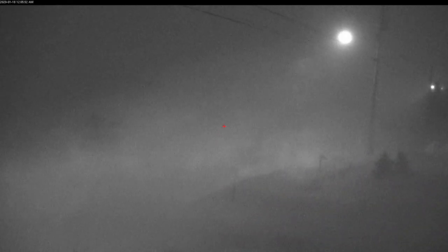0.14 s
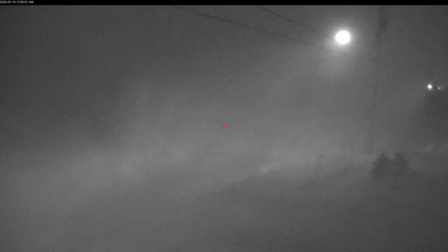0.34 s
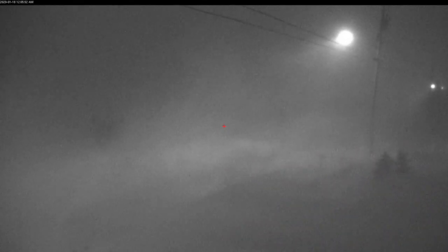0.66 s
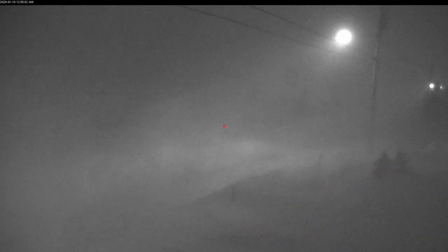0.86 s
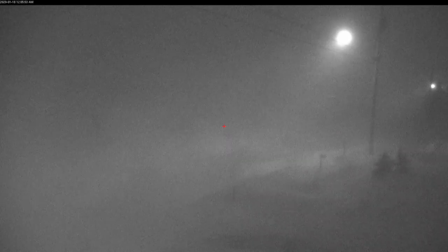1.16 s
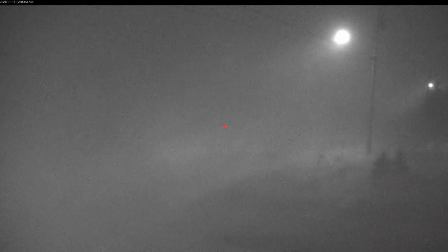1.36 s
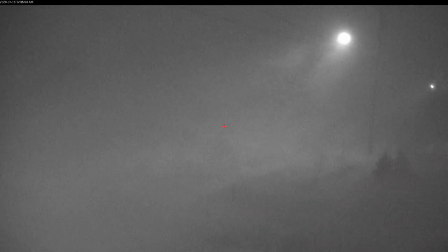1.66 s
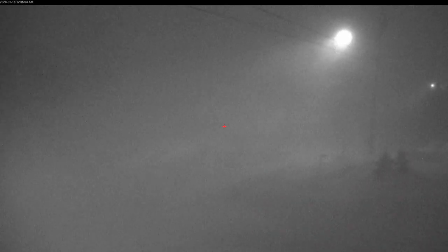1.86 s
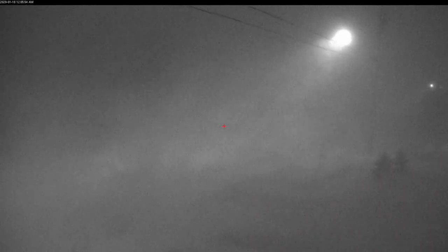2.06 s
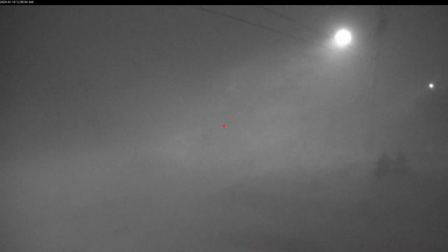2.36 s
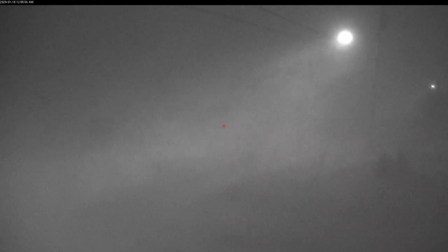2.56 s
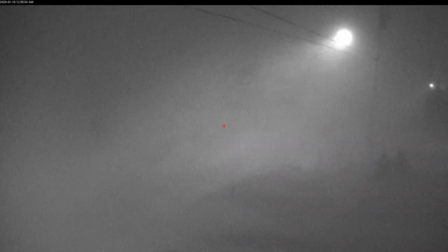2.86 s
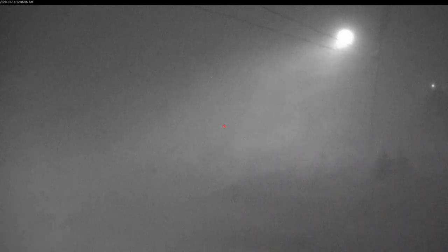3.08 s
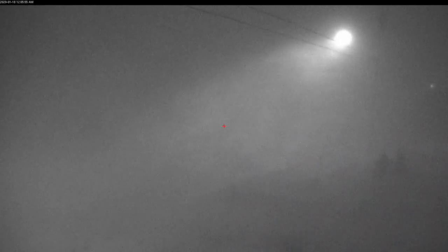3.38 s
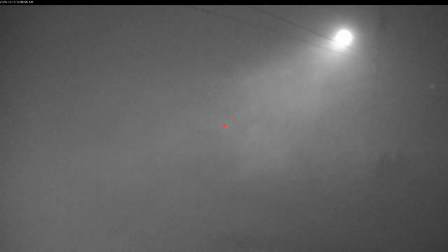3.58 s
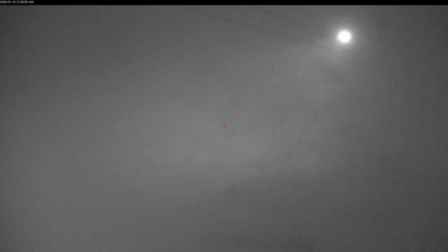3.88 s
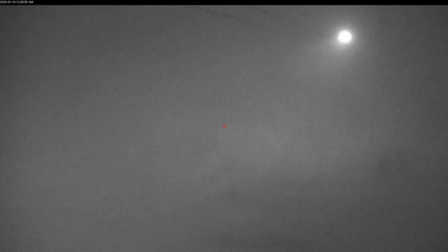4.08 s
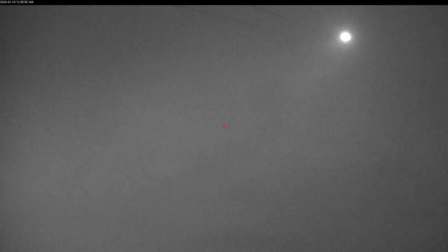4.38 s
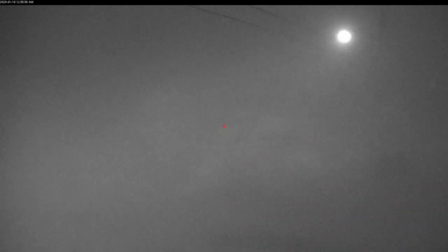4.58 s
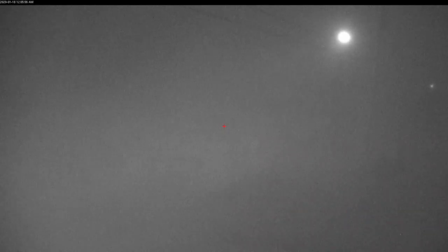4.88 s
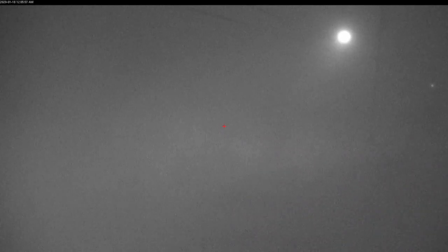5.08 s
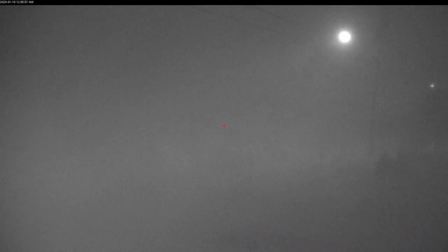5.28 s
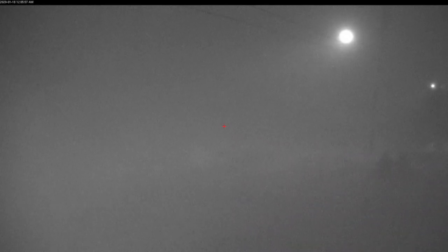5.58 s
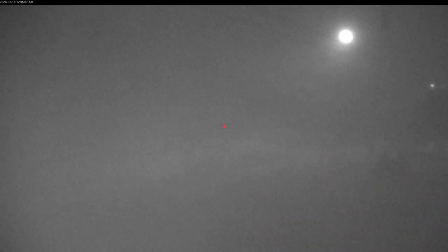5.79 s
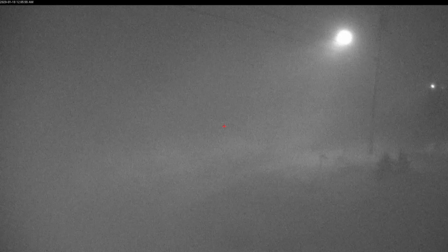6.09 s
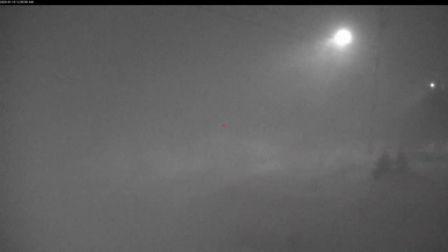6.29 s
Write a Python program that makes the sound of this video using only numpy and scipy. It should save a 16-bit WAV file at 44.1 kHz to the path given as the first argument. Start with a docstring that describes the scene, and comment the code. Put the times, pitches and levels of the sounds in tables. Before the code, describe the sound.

Storm wind buffets the microphone of an outdoor camera for about six and a half seconds: a deep, fluttering rumble with a hollow, drumming roar from the housing. The first second is lighter, with brief lulls. A gust hits at about 1.1 seconds with low thumps, eases, and further gusts follow between 2 and 3 seconds. A strong surge arrives around 4 seconds, dips briefly near 4.4, and then the wind stays heavy, peaking near 5, 5.9 and 6.2 seconds. The mount thumps deeply several times from 4.5 to 6 seconds. Short, dull knocks jolt the housing, most clearly near 2.3 and 4 seconds. Much quieter than the wind, blown snow hisses in flurries and thickens toward the end, while single ice pellets tick irregularly on the shell throughout. Everything sounds very close and in mono.

```python
"""Night blizzard on a security camera

Wind blows against an outdoor camera with one microphone. Eddies buffet the port and thump the mount;
gusts roar in the hollow housing and now and then knock it. Blown snow hisses on the shell, and
single ice pellets tick against it. The resonances of the housing colour both wind and snow."""
import sys
import numpy as np
from scipy import signal
from scipy.fft import rfft, irfft
from scipy.io import wavfile
from scipy.ndimage import uniform_filter1d

SR = 44100
rng = np.random.default_rng(int(sys.argv[2]) if len(sys.argv) > 2 else 0)


def wav_record(signal):
    """Record a signal, one row per channel, as 16-bit PCM in the file named by sys.argv[1]."""
    frames = np.transpose(np.atleast_2d(signal))
    bounded = np.clip(frames, -1, 1)
    # unit amplitude maps onto the largest positive 16-bit level
    quanta = np.round(bounded * 32767).astype(np.int16)
    wavfile.write(sys.argv[1], SR, quanta)


N = 284004
T = np.arange(N) / SR


def undb(db):
    """Amplitude grows tenfold with every 20 dB."""
    return 10 ** (np.asarray(db) / 20)


def contour(table):
    """Linear interpolation joins rows of time and level into a curve."""
    return np.interp(T, *np.transpose(table))


def swell(peak_s, rise_s, fall_s):
    """A raised-cosine envelope climbs from 0 to 1 and falls back."""
    return np.sin(np.pi / 2 * np.interp(T, [peak_s - rise_s, peak_s, peak_s + fall_s], [0, 1, 0])) ** 2


def add(out, start_s, sound):
    """Superposition: a sound adds to the pressure already there."""
    i = max(int(start_s * SR), 0)
    out[i:i + len(sound)] += sound[:N - i]


def steady(x, seconds):
    """Division by the running rms evens out swells longer than the given time."""
    size = int(seconds * SR)
    return x / np.sqrt(uniform_filter1d(uniform_filter1d(x * x, size), size) + 1e-12)


def turbulence(flutter_db, flutter_hz):
    """Amplitude modulation: noise swells and sinks at random as eddies pass."""
    hz = np.arange(N // 2 + 1) * SR / N
    noise = rng.standard_normal(N)
    flutter = irfft(rfft(rng.standard_normal(N)) * hz / (hz + 2) / (1 + (hz / flutter_hz) ** 4), N)
    noise *= undb(flutter_db * flutter / flutter.std())
    return noise / noise.std()


# Resonances of the housing and its mount. Each row: frequency in Hz, width in Hz, lift in dB.
HOUSING_MODES = [(123, 31, 3.5), (167.3, 12.3, 9), (242, 16.5, 4), (283.4, 18.3, 6), (324.9, 14.4, 8.5),
                 (412.5, 25, 6), (513, 8.7, 1), (522.4, 9.2, 9.5), (929, 30, 6.5), (1005, 54, 1.5),
                 (1170, 19, 4), (1403, 27, 3.5), (1695, 23, 6), (1914, 64, 7), (2830, 91, -1.5),
                 (3315, 33, 8), (4280, 110, 5), (4686, 42, 5.5), (5080, 150, 6), (5480, 120, 2.5),
                 (6880, 890, 3), (12900, 570, 4)]
def through_housing(x, spectrum, band_hz):
    """Resonance adds peaks to a smooth spectrum; the rms of white input reappears within the band."""
    hz = np.maximum(np.arange(N // 2 + 1) * SR / N, 1)
    points_hz, points_db = np.transpose(spectrum)
    db = np.interp(np.log(hz), np.log(points_hz), points_db)
    db += sum(lift / (1 + (2 * (hz - centre) / width) ** 2) for centre, width, lift in HOUSING_MODES)
    inside = (hz > band_hz[0]) & (hz < band_hz[1])
    gain = undb(db) / np.sqrt(np.mean(inside * undb(db) ** 2))
    # Minimum phase: the shell rings after a blow, never before.
    cepstrum = irfft(np.log(gain), N)
    cepstrum[1:N // 2] *= 2
    cepstrum[N // 2 + 1:] = 0
    return irfft(rfft(x) * np.exp(rfft(cepstrum)), N)


# Hiss of the snow between flurries. Each row: time in seconds, level in dB.
SNOW_LEVELS = [(0, -62), (.55, -66), (1.45, -69), (2.2, -66.5), (2.7, -63.5), (3.35, -61), (3.75, -64),
               (4.4, -60.5), (5.4, -60.5), (6.44, -55.5)]
# Flurries. Each row: peak time, rise and fall in seconds, lift in dB.
SNOW_FLURRIES = [(.12, 0.074, 0.11, 4), (.83, 0.34, 0.28, 7), (1.16, 0.09, 0.1, 3), (2.48, 0.15, 0.14, 5.5),
                 (2.99, 0.31, 0.43, 7), (3.6, 0.059, 0.1, 6.5), (4.13, 0.51, 0.29, 8),
                 (4.56, 0.084, 0.2, 3.5), (4.9, 0.13, 0.31, 7.5), (5.16, 0.071, 0.19, 6.5),
                 (5.92, 0.68, 0.28, 5), (6.25, 0.14, 0.056, 5)]
def snow_load():
    """Independent impacts add in power, so the level of the hiss (dB) rises in each flurry."""
    flurry_db = sum(lift * swell(peak, rise, fall) for peak, rise, fall, lift in SNOW_FLURRIES)
    return contour(SNOW_LEVELS) + flurry_db


def drift(level_db, grains_per_s, size_spread_db, grain_db):
    """Shot noise: single grains stand out of a smooth stream, more often when the snow is thick."""
    chance = grains_per_s / SR * undb(level_db - level_db.mean())
    sizes = undb(size_spread_db * np.minimum(rng.exponential(size=N), 6))
    grains = (rng.random(N) < chance) * sizes * rng.choice([-1, 1], N)
    stream = turbulence(flutter_db=1.27, flutter_hz=35) + undb(grain_db) * grains / grains.std()
    return stream / stream.std() * undb(level_db)


# Spectra of fine and of coarse snow. Each row: frequency in Hz, relative density in dB.
POWDER_SPECTRUM = [(2000, -24), (5000, -1.5), (8000, 3), (11000, 3.5), (13300, 2), (15000, -1), (16000, -8)]
COARSE_SPECTRUM = [(800, -15), (2400, -4.5), (3000, 0.5), (3800, -1.5), (4600, 3), (6200, -2), (8000, -11),
                   (11000, -14), (16000, -30)]
def snow(powder_db, airflow_db, powder_ref_db=-58.5):
    """Dense impacts merge into noise: powder hisses; coarse snow, lifted by wind, sizzles lower."""
    coarse_db = -57.5 + 0.63 * (powder_db - powder_ref_db) + 0.32 * airflow_db
    powder = drift(powder_db, grains_per_s=900, size_spread_db=2.0, grain_db=-9.0)
    coarse = drift(coarse_db, grains_per_s=650, size_spread_db=7.0, grain_db=-8.5)
    hiss = through_housing(powder, POWDER_SPECTRUM, (7000, 15000))
    return hiss + through_housing(coarse, COARSE_SPECTRUM, (3000, 6500))


def stray_pellets(powder_db, per_s=16, over_hiss_db=5, spread_db=3.5, centre_hz=8000, ring_db=-9):
    """Random arrivals: small pellets, harder in thick snow, in rows like those of ICE_PELLETS."""
    slots = N // 441
    slot_s = N / SR / slots
    rows = []
    for k, (falls, size, pitch) in enumerate(rng.random((slots, 3))):
        if falls < per_s * slot_s:
            db = np.interp(k * slot_s, T, powder_db) + over_hiss_db + spread_db * (2 * size - 1)
            rows.append((k * slot_s, db, centre_hz * 2 ** ((pitch - .5) / 2), ring_db))
    return rows


# Modes of the struck shell. Each row: frequency in Hz, relative level in dB, 60 dB decay in seconds.
SHELL_RING = [(1870, -4, .014), (2700, -5, .01), (3390, 1, .013), (4240, 3.5, 0.018), (4700, -4, .016),
              (5100, 4, 0.015), (6800, 1, 0.019)]
# Pellets that stand out, and the sharp crack that opens the knock at 2.33 s. Each row: start in seconds, #
# relative level in dB, brightest pitch in Hz, ring of the shell in dB relative to the tick.
ICE_PELLETS = [(.135, -47, 7800, -13), (.3269, -46, 7500, -14), (.3586, -57, 7800, -14),
               (.8105, -45, 8000, 0), (.8612, -53, 9000, -16), (.9407, -47, 8000, -4),
               (1.2221, -48, 8000, -12), (1.2571, -50, 7200, -9), (1.8572, -47, 6000, -8),
               (1.8699, -36, 6200, -10), (1.9893, -54, 7000, -12), (2.0288, -51, 6800, -10),
               (2.2667, -57, 7200, -6), (2.3327, -42.5, 6500, -2), (2.36, -46, 7000, -12),
               (2.5562, -49, 8000, -10), (2.8895, -40, 8200, -6), (3.0176, -44, 12000, -12),
               (3.1893, -48, 9000, -7), (3.2201, -46, 6500, -1), (3.3574, -44, 9000, -14),
               (3.4048, -47, 12000, -14), (3.4766, -50, 9400, -6), (3.5195, -41.5, 12500, -18),
               (3.6347, -45, 9000, -18), (3.7872, -47, 8800, -24), (3.8103, -43.5, 7300, -1),
               (4.1205, -46, 8000, -5), (4.4816, -40, 7800, -6), (4.5816, -37.5, 11200, -20),
               (4.8535, -40, 8000, -16), (5.0164, -35, 12000, -13), (5.1482, -41, 10000, 1.5),
               (5.3129, -44, 12000, -18), (5.3866, -53, 12000, -12), (5.4562, -42.5, 10500, -1),
               (5.6328, -44, 8500, -7), (5.6598, -44.5, 8000, 3)]
def pellets(powder_db, contact_s=.0003, chatter_s=.002, chatter_db=-15, level_db=-1.5):
    """Impact excitation: each pellet scrapes for an instant, chatters and sets the shell ringing."""
    out, t = np.zeros(N), T[:1024]
    tick_samples = .0015 * SR  # a tick has the energy of 1.5 ms of noise at its level
    envelope = np.exp(-t / contact_s) + undb(chatter_db) * np.exp(-t / chatter_s)
    for start, db, pitch_hz, ring_db in ICE_PELLETS + stray_pellets(powder_db):
        contact = rng.standard_normal(len(t)) * envelope
        tick = signal.lfilter(*signal.iirpeak(pitch_hz, Q=1.2, fs=SR), contact)
        ring = np.zeros(len(t))
        for hz, mode_db, t60 in SHELL_RING:
            detuned_hz = hz * (1 + 0.037 * rng.standard_normal())
            ring += undb(mode_db - 60 * t / t60) * np.sin(2 * np.pi * detuned_hz * t)
        sound = tick / np.linalg.norm(tick) + undb(ring_db) * ring / np.linalg.norm(ring)
        add(out, start, sound * undb(db + level_db) * np.sqrt(tick_samples))
    return out


# Deep thumps of the mount. Each row: start in seconds, envelope peak in dB.
MOUNT_THUMPS = [(1.11, -27), (1.25, -30), (2.3, -27), (4.45, -28), (4.79, -25), (5.04, -21), (5.555, -21.5),
                (5.92, -23)]
def thumps(mount_hz=57, push_s=0.032, ring_t60=0.18):
    """Damped oscillation: a heavy eddy leans on the mount, which swings up and dies away."""
    out, t = np.zeros(N), T[:16384]
    rise = np.sin(np.pi / 2 * np.minimum(t / push_s, 1)) ** 2
    decay = undb(-60 * np.maximum(t - push_s, 0) / ring_t60)
    for start, db in MOUNT_THUMPS:
        hz = mount_hz * (1 + 0.055 * rng.standard_normal())
        add(out, start, rise * decay * undb(db) * np.sin(2 * np.pi * hz * t))
    return out


# Spectra of a knock's rattle and boom. Each row: frequency in Hz, relative density in dB.
RATTLE_SPECTRUM = [(50, -8), (150, 7), (400, 4), (720, 4), (950, -2), (1400, -5), (2000, -16), (3200, -16),
                   (4500, -20), (9000, -28), (16000, -43)]
BOOM_SPECTRUM = [(60, -18), (130, -2), (300, 0), (500, -2), (750, -6), (1200, -22), (4000, -60)]
# Knocks. Each row: start in seconds, rattle level in dB, its 60 dB decay in seconds, push level in dB.
HOUSING_KNOCKS = [(1.869, -45, .11, -42), (2.3274, -36.5, .08, -17.5), (2.471, -39, .06, -40),
                  (2.5155, -41, .04, -29), (2.938, -39.5, .08, -37), (3.922, -46, .07, -22.5),
                  (4.0605, -35, .07, -40), (4.155, -42.5, .05, -37), (5.838, -38.5, .12, -38),
                  (6.275, -44, .05, -31)]
def knocks(push_s=.0005, rebound_s=.003, boom_db=-14, boom_t60=0.077):
    """Transient response: a gust jolts the housing, which rebounds, rattles dully and booms."""
    pushes, rattles, booms, t = np.zeros(N), np.zeros(N), np.zeros(N), T[:8192]
    push = t / push_s * np.exp(1 - t / push_s)
    rebound = t / rebound_s * np.exp(1 - t / rebound_s)
    jolt = push - rebound * push.sum() / rebound.sum()  # no net impulse
    for start, rattle_db, t60, push_db in HOUSING_KNOCKS:
        add(pushes, start, jolt * undb(push_db))
        add(rattles, start, rng.standard_normal(len(t)) * undb(rattle_db - 60 * t / t60))
        add(booms, start, rng.standard_normal(len(t)) * undb(push_db + boom_db - 60 * t / boom_t60))
    rattles = through_housing(rattles, RATTLE_SPECTRUM, (500, 2500))
    return pushes + rattles + through_housing(booms, BOOM_SPECTRUM, (150, 800))


# Wind between gusts, building to a storm. Each row: time in seconds, relative strength in dB.
WIND_STRENGTH = [(0, -4.5), (.95, -7.5), (1.6, -6.5), (2.2, -3.5), (3.7, -5.5), (4.45, -1.5), (5.35, -0.5),
                 (6.44, 1)]
# Gusts. Each row: peak time, rise and fall in seconds, lifts of the rush and the drumming in dB.
WIND_GUSTS = [(1.13, 0.098, 0.22, 6, 5.5), (2.05, 0.57, 0.2, 2, 3), (2.33, 0.026, 0.097, 2.5, 5.5),
              (2.52, 0.13, 0.088, -1.5, 5.5), (2.92, 0.25, 0.2, 6.5, 5), (3.2, 0.17, 0.23, 0, 2.5),
              (3.93, 0.26, 0.12, 6, 5.5), (4.07, 0.25, 0.3, 6.5, 3), (4.56, 0.18, 0.11, 3, -0.5),
              (4.95, 0.16, 0.13, 1.5, 3), (5.13, 0.072, 0.11, 2, 4.5), (5.88, 0.11, 0.22, 5, 7),
              (6.23, 0.2, 0.14, 4, 5.5)]
def airflow():
    """Flow noise follows the mean wind and its gusts: relative dB of wind, drumming and rush."""
    wind_db = contour(WIND_STRENGTH)
    drum_db, rush_db = 0.51 * wind_db, wind_db.copy()
    for peak, rise, fall, rush_lift, drum_lift in WIND_GUSTS:
        gust = swell(peak, rise, fall)
        drum_db += drum_lift * gust
        rush_db += rush_lift * gust
    return wind_db, drum_db, rush_db


# Spectra of the drumming and the rush. Each row: frequency in Hz, relative density in dB.
DRUM_SPECTRUM = [(45, -15), (80, -2), (115, 1), (200, -5.5), (330, -8.5), (420, -10), (480, -17.5),
                 (700, -24.5), (1500, -39.5), (5000, -77)]
RUSH_SPECTRUM = [(150, 1.5), (400, -3), (600, 1.5), (800, -1.5), (1200, -0.5), (1600, -7.5), (2050, -8),
                 (2400, -16), (3200, -12.5), (5000, -21.5), (16000, -52)]
def roar(drum_db, rush_db, drum_base_db=-41, rush_base_db=-51.5):
    """Flow separation: air tearing off the housing drums on it and rushes round its edges."""
    drumming = turbulence(flutter_db=1.34, flutter_hz=22.2) * undb(drum_base_db + drum_db)
    rushing = turbulence(flutter_db=1.0, flutter_hz=34) * undb(rush_base_db + rush_db)
    rumble = through_housing(drumming, DRUM_SPECTRUM, (90, 450))
    return rumble + through_housing(rushing, RUSH_SPECTRUM, (550, 2200))


# Spectra of the diaphragm's sway and thud. Each row: frequency in Hz, relative density in dB.
SWAY_SPECTRUM = [(2, -11), (5, -6), (8.5, 1), (12, 0), (18, -7.5), (24, -17.5), (40, -67.5), (90, -100)]
THUD_SPECTRUM = [(14, -12.5), (24, -2), (32, 1.5), (46, -12), (59, -6), (68, -15.5), (80, -28.5),
                 (160, -66), (600, -114)]
# Underlying thudding on the port. Each row: time in seconds, level in dB.
THUD_LEVELS = [(0, -35.5), (.85, -32), (1.25, -36.5), (1.7, -31), (2.6, -29.5), (3.15, -30.5), (3.7, -31),
               (4.4, -28.5), (5.0, -27), (5.5, -28), (6.44, -29)]
# Large eddies at the port. Each row: centre and length in seconds, lifts of sway and thud in dB.
PORT_EDDIES = [(1.143, 0.22, 8, 8), (1.267, 0.17, 0, 4), (2.457, 0.39, 11, 0), (2.761, 0.25, 11, 6),
               (3.37, 0.21, 0, -1), (4.035, 0.19, -3, 8.5), (4.226, 0.083, 13.5, 1),
               (4.545, 0.19, 8.5, -11), (4.83, 0.16, 5.5, 7), (5.014, .1, 3.5, 0), (5.113, 0.099, 8.5, 6.5),
               (5.373, .13, -2, 6.5), (5.637, 0.12, 6, 2), (5.954, 0.9, 5, 2.5), (6.305, 0.39, 7.5, 3)]
# Lulls in the lee. Each row: centre and length in seconds, drop of the thud in dB (negative lifts it).
PORT_LULLS = [(0.096, 0.11, 9), (0.457, 0.34, 12), (0.837, 0.15, 9), (1.35, 0.095, 2), (3.02, 0.2, -3),
              (3.59, .12, -4), (4.44, 0.22, 12), (5.32, 0.068, 1)]
def buffeting(wind_db):
    """Turbulent pressure: large eddies push the diaphragm to and fro; smaller ones thud on it."""
    sway_db, thud_db = -14.5 + 0.39 * wind_db, contour(THUD_LEVELS)
    for centre, length, sway_lift, thud_lift in PORT_EDDIES:
        eddy = swell(centre, length / 2, length / 2)
        sway_db += sway_lift * eddy
        thud_db += thud_lift * eddy
    for centre, length, drop in PORT_LULLS:
        thud_db -= drop * swell(centre, length / 2, length / 2)
    sway = steady(through_housing(rng.standard_normal(N), SWAY_SPECTRUM, (4, 22)), seconds=.2)
    thud = steady(through_housing(rng.standard_normal(N), THUD_SPECTRUM, (28, 78)), seconds=.08)
    return sway * undb(sway_db) + thud * undb(thud_db)


def scene():
    """All pressures superpose at one microphone, so both channels are alike."""
    wind_db, drum_db, rush_db = airflow()
    powder_db = snow_load()
    wind = buffeting(wind_db) + roar(drum_db, rush_db)
    sound = wind + snow(powder_db, rush_db) + knocks() + thumps() + pellets(powder_db)
    return np.array([sound, sound])


def record(dry):
    """Soft saturation in the microphone rounds the largest swings; a low-pass cuts the top."""
    ceiling, top_hz = .95, 15900
    rounded = dry / (1 + (dry / ceiling) ** 6) ** (1 / 6)
    return signal.sosfilt(signal.ellip(10, .2, 80, top_hz, fs=SR, output="sos"), rounded)


dry = scene()
out = record(dry)
wav_record(out)
```